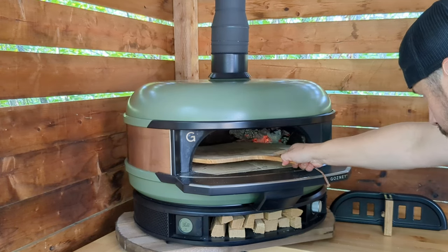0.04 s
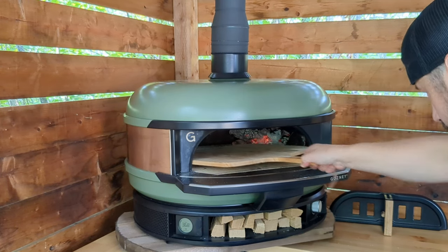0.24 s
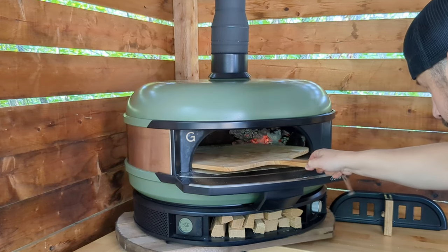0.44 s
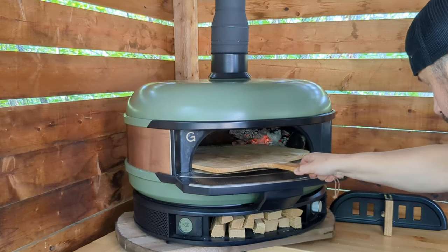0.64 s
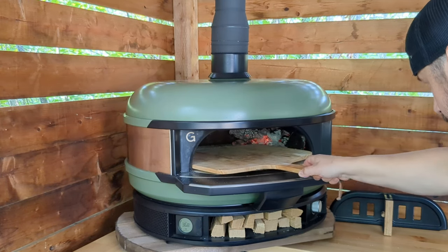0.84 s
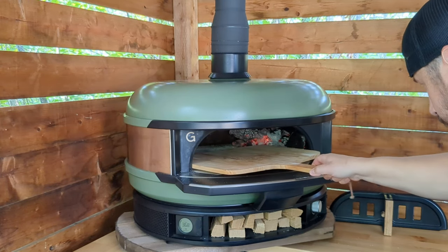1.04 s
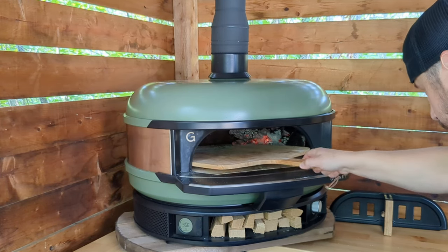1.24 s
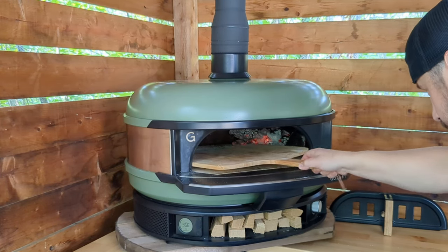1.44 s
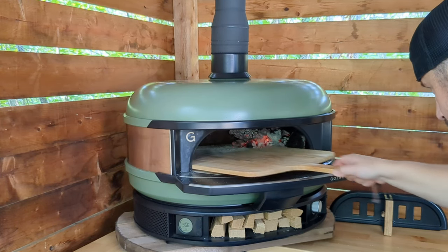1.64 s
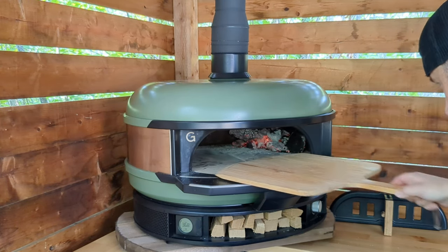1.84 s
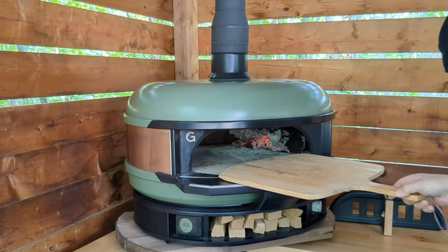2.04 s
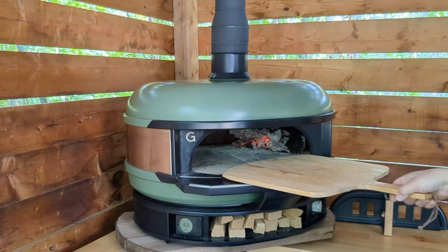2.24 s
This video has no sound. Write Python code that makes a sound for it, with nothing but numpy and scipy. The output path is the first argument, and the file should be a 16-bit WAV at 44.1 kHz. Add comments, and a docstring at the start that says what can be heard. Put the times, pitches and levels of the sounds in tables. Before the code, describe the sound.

Short rasping strokes of a wooden paddle ring faintly inside a pizza oven under a timber shelter. Early on the blade clacks and thumps down, then shudders as it drags, squeaks briefly and bumps its way out.

```python
"""A wooden peel (a baker's paddle) is shuffled over the stone floor of a domed oven, then drawn out.
Grit under its blade rasps in short strokes and makes the dome ring; the edge catches and chirps.
The blade drops once with a clack and a thump, shudders as it is dragged and gives soft, hollow knocks.
The timber shelter around the oven adds a short echo, over quiet outdoor air."""
import sys
import numpy as np
from scipy import signal
from scipy.fft import rfft, irfft
from scipy.io import wavfile
from scipy.ndimage import uniform_filter1d

SR = 44100
rng = np.random.default_rng(int(sys.argv[2]) if len(sys.argv) > 2 else 0)


def log_audio(samples):
    """Write samples as a 16-bit WAV file to the path given in sys.argv[1]."""
    # one column per channel
    frames = np.atleast_2d(samples).T
    # limit to full scale, then quantise
    limited = np.clip(frames, -1, 1)
    pcm = np.round(limited * 32767).astype(np.int16)
    wavfile.write(sys.argv[1], SR, pcm)


N = 101429
T = np.arange(N) / SR
HZ = np.fft.rfftfreq(N, 1 / SR)


# How far the blade is out of the dome. Each row: time in seconds, share from 0 (in) to 1 (out).
BLADE_OUT = [(1.62, 0.06), (1.79, 0.26), (1.86, 0.98), (1.99, 0.83), (2.1, 0.5)]
# The rasp's tone inside the dome and on the oven's lip. Each row: frequency in Hz, level in dB.
RASP_INSIDE = [(60, -33), (205, -10), (310, -27), (520, -11), (830, -12), (1150, -11), (1600, -2.5),
               (2100, -9), (2700, -4.5), (3700, -10), (5400, -20.5), (8000, -22.5), (11000, -18),
               (15000, -31)]
RASP_ON_LIP = [(100, -29), (900, -9), (1500, -3), (2700, -4), (4400, -6.5), (5800, -10), (8000, -14),
               (11500, -13), (15500, -22)]

def scrape():
    """Grit and wood fibre rasp under the chattering blade, ringing the dome less as the blade leaves."""
    grains_per_s, ripple_db, ripple_step_hz = 5000, 2, 45.16
    grit = (rng.random(N) < grains_per_s / SR) * amp(np.minimum(rng.exponential(1, N), 5))
    friction = rng.standard_normal((2, N)) + amp(-2) * unit(grit * rng.choice([-1, 1], (2, N)))
    friction *= amp(0.76 * wander(rate_hz=90))  # chatter
    # Small random peaks in the tone stand for the dome's many high notes.
    steps = np.arange(0, SR / 2, ripple_step_hz)
    peaks = np.interp(HZ, steps, rng.standard_normal(len(HZ))[:len(steps)])
    ripple = amp(ripple_db * np.minimum(HZ / 3500, 1) * peaks)
    share_out = np.clip(curve(BLADE_OUT), 0, 1)
    rub = rubbing()
    inside = amp(-3.5) * (1 - share_out) * spread(friction, ripple * amp(read(RASP_INSIDE, HZ)))
    on_lip = amp(-4) * share_out * spread(friction, ripple * amp(read(RASP_ON_LIP, HZ)))
    return (inside + on_lip) * rub + dome((1 - share_out) * rub)


# Pushes and pulls of the blade. Each row: start in seconds, length in seconds, level in dB,
# swell time in seconds, change of level over the stroke in dB.
BLADE_STROKES = [(-.03, 0.02, -54, .01, 6.5), (0.033, 0.069, -54, 0.032, -2),
                 (0.134, 0.14, -43.5, 0.094, 1), (0.253, 0.12, -42, 0.09, 4),
                 (0.492, 0.061, -48.5, 0.066, -1.5), (0.576, 0.18, -46, 0.017, -6),
                 (0.796, 0.15, -50, 0.019, -7.5), (0.948, 0.16, -40.5, 0.14, -2),
                 (1.133, 0.14, -42, 0.04, -1), (1.328, 0.082, -39, 0.025, -9),
                 (1.442, 0.077, -44.5, 0.041, -3), (1.542, 0.21, -40, 0.086, 4),
                 (1.734, 0.27, -41, 0.042, -4), (2.067, 0.07, -47.5, 0.028, -5.5)]

def rubbing():
    """The strength of the rub: each stroke swells, lasts while the blade moves, then dies quickly."""
    fade_db_per_s = 319
    power = np.zeros(N)
    for start, length, db, swell_s, change_db in BLADE_STROKES:
        t = T - start
        swell = np.sin(np.pi / 2 * np.clip(t / swell_s, 0, 1))
        level_db = db + change_db * np.clip(t / length, 0, 1) - fade_db_per_s * np.maximum(t - length, 0)
        power += (swell * amp(level_db)) ** 2
    return np.sqrt(power)


# The notes the dome rings at. Each row: pitch in Hz, relative level in dB.
DOME_NOTES = [(400, -1), (640, -8), (998, 6), (1046, 10.5), (1124, 1), (1194, -1), (1345, 0), (1466, 7),
              (1522, 4), (1703, 7), (1868, 5), (1962, 2), (2222, 3.5), (2295, 7), (2453, 0), (2635, 1),
              (2800, 1), (3030, -3), (4040, -5)]

def dome(force):
    """Rubbing rings the oven's hollow; as the contact point moves, now one note stands out, now another."""
    width_hz, flicker_db = 26, 3.5
    notes = sum(amp(db) / (1 + 1j * (HZ - hz) / width_hz) ** 2 for hz, db in DOME_NOTES)
    spectra = signal.stft(rng.standard_normal((2, N)), nperseg=512)[2]
    # Random loud and soft patches, smoothed over time and then over pitch.
    patches = uniform_filter1d(rng.standard_normal(spectra.shape[1:]), size=7, axis=1)
    patches = unit(uniform_filter1d(patches, size=2, axis=0))
    noise = signal.istft(spectra * amp(flicker_db * np.clip(patches, -2, 2)))[1][:, :N]
    return np.sqrt(np.mean(force ** 2)) * spread(force * noise, notes)


# Chirps of the edge. Each row: start in seconds, length in seconds, level in dB, pitch in Hz.
CHIRPS = [(0.2, 0.039, -40, 1017), (.3, 0.047, -39.5, 1033), (1.56, 0.026, -44, 2295),
          (1.596, .028, -44, 2295), (1.63, 0.011, -34, 1050), (1.686, 0.023, -32.5, 1055),
          (1.712, 0.051, -41, 1515), (1.721, 0.032, -36.5, 3060), (1.722, 0.055, -42, 2760),
          (1.82, 0.022, -40.5, 1257)]

def catches():
    """The edge sticks and slips, giving brief chirps that waver in pitch."""
    out = np.zeros(N)
    for start, length, db, hz in CHIRPS:
        t = np.arange(0, length, 1 / SR)
        cycles = np.cumsum(hz * (1 + 0.015 * wander(rate_hz=73)[:len(t)])) / SR
        add(out, start, amp(db) * np.sin(np.pi * t / length) * np.sin(2 * np.pi * cycles))
    return shelter(out, wet_db=-5)


# The edge hitting the stone. Each row: start in seconds, relative level in dB.
EDGE_HITS = [(.371, -20.5), (.38, -21), (1.767, -32), (1.796, -40)]
# The notes of the clacking edge and of the whole peel bending.
# Each row: pitch in Hz, relative level in dB, seconds to fade by 60 dB.
CLACK_NOTES = [(275, -4, .07), (400, -6, .1), (570, -11, .06), (650, -3, .07), (800, -9, .075),
               (1040, -3, .085), (1338, 3, .05), (1460, -3, .05), (1610, -5, .05), (1715, -2, .05),
               (2340, -11, .05)]
THUMP_NOTES = [(72.46, -24.5, 0.86), (95.2, -17.5, 0.47), (114.3, -5, 0.35), (177, -11.5, 0.28),
               (208.7, -2.5, 0.17), (286.8, -8, 0.094), (371, -17.5, 0.267)]

def drops():
    """The edge clacks down on the stone; once, the peel's weight follows with a thump."""
    thump_s, thump_db = 0.378, -15.5
    edge, body = np.zeros(N), np.zeros(N)
    for start, db in EDGE_HITS:
        add(edge, start, amp(db - 9.5) * ring(CLACK_NOTES, rise_cycles=0.24, bright_hz=3000))
        add(edge, start, amp(db - 14.5) * crunch(fade_s=0.075, top_hz=2060))
    add(body, thump_s, amp(thump_db) * ring(THUMP_NOTES, rise_cycles=1.9, bright_hz=700))
    add(body, thump_s, amp(thump_db - 18) * crunch(fade_s=0.17, top_hz=700))
    return shelter(edge, wet_db=-7) + shelter(body, wet_db=-15)


# The shaking of the peel. Each row: time in seconds, level in dB, pitch of the low note in Hz.
PEEL_SHUDDER = [(0, -68.5, 111.3), (.4, -55.5, 113.6), (.5, -41, 110.7), (.55, -52, 95.3),
                (.61, -42, 110.2), (.67, -48, 100), (.72, -50, 92.6), (.95, -60, 93.25), (1.08, -51, 111.8),
                (1.3, -72, 109.9), (1.95, -67.5, 112.7), (2.02, -53.5, 105)]

def shudder():
    """Dragging shakes the peel at a low note and its overtone, near the thump's two strongest notes."""
    overtone_ratio, overtone_db = 1.9, -7
    phase = 2 * np.pi * np.cumsum(curve(PEEL_SHUDDER, column=2)) / SR
    low_wobble = 1 + 0.55 * (wander(rate_hz=32) + 1j * wander(rate_hz=42))  # in level and phase
    high_wobble = wander(rate_hz=26) + 1j * wander(rate_hz=46)
    low = (np.exp(1j * phase) * low_wobble).real
    high = (np.exp(1j * overtone_ratio * phase) * high_wobble).real
    return amp(curve(PEEL_SHUDDER)) * (unit(low) + amp(overtone_db) * unit(high))


# Bumps of the blade. Each row: start in seconds, relative level in dB, treble limit in Hz, pitch factor.
BUMPS = [(.085, -49, 503, 1.06), (0.163, -42, 200, 0.74), (0.3, -36, 230, 0.97), (1.043, -45.5, 234, 0.82),
         (1.757, -28, 227, 0.99), (1.993, -33, 760, 1), (2.175, -42.5, 422, 0.87)]
# Their ring. Each row: pitch in Hz before that factor, relative level in dB, seconds to fade by 60 dB.
HOLLOW_NOTES = [(216, 0, 0.08), (384, 3, 0.13), (425, -3, 0.13), (555, -3, 0.06), (606, -7, 0.18),
                (862, -6, 0.14)]

def knocks():
    """The blade bumps the oven's floor and lip with a soft, hollow sound."""
    out = np.zeros(N)
    for start, db, bright_hz, pitch in BUMPS:
        notes = np.array(HOLLOW_NOTES) * [pitch, 1, 1]
        add(out, start, amp(db - 3.5) * ring(notes, rise_cycles=0.29, bright_hz=bright_hz))
        add(out, start, amp(db - 20) * crunch(fade_s=0.1, top_hz=bright_hz))
    return shelter(out, wet_db=-10)


def ring(notes, rise_cycles, bright_hz):
    """Struck wood: each note builds up quickly and dies away; a soft blow leaves out the high ones."""
    t = np.arange(SR) / SR
    out = np.zeros(SR)
    for k, (hz, db, fade_s) in enumerate(notes):
        envelope = amp(db - 60 * t / fade_s) * (1 - np.exp(-t * hz / rise_cycles))
        muffling = np.sqrt(1 + (hz / bright_hz) ** 8)
        out += (-1) ** k * envelope * np.sin(2 * np.pi * hz * t) / muffling
    return out


def crunch(fade_s, top_hz):
    """A short puff of noise from crushed grit."""
    t = np.arange(SR // 4) / SR
    band = signal.butter(2, [top_hz / 4, top_hz], "band", fs=SR)
    return unit(signal.lfilter(*band, rng.standard_normal(len(t)))) * amp(-60 * t / fade_s)


# The length of the shelter's echo. Each row: frequency in Hz, seconds to fade by 60 dB.
ECHO_TIMES = [(100, 0.55), (2000, 0.055), (15000, 0.076)]

def shelter(x, wet_db):
    """Adds the short, blurred echo of the timber walls, at level wet_db."""
    echoes = spread(rng.standard_normal((2, N)), 1)[:, :SR // 2] * (T[:SR // 2] > 0.004)
    hz, t, spectra = signal.stft(echoes, SR, nperseg=256)
    tail = signal.istft(spectra * amp(-60 * t / read(ECHO_TIMES, hz)[:, None]), SR, nperseg=256)[1]
    tail /= np.linalg.norm(tail[0])
    return x + amp(wet_db) * signal.fftconvolve(np.atleast_2d(x), tail, axes=1)[:, :N]


# The tone of the outdoor air. Each row: frequency in Hz, relative level in dB.
AIR_TONE = [(25, -9), (60, 5), (150, -7), (600, -13.5), (1500, -25), (15500, -39)]

def air():
    """A quiet, steady, low outdoor rush."""
    return amp(-58.5) * spread(rng.standard_normal((2, N)), amp(read(AIR_TONE, HZ)))


# How alike left and right are. Each row: frequency in Hz, likeness from 0 to 1.
LIKENESS = [(130, 0.99), (300, 0.9), (600, 0.52), (2000, .5), (5000, 0.05)]
# Which side is louder. Each row: frequency in Hz, left minus right in dB.
LEFT_RIGHT = [(1100, -0.57), (2500, 0.74), (9000, 0.62), (13000, -2.2)]

def spread(pair, tone):
    """Turns two unrelated signals into stereo of standard level with this tone, alike in the bass."""
    a, b = rfft(pair)
    same = read(LIKENESS, HZ)
    mid, side = a * np.sqrt(1 + same), b * np.sqrt(1 - same)
    tilt = amp(read(LEFT_RIGHT, HZ) / 2)
    out = irfft(np.array([(mid + side) * tilt, (mid - side) / tilt]) * tone, N)
    return out / np.std(out.mean(0))


def amp(db):
    """Turns decibels into a gain."""
    return 10 ** (np.asarray(db) / 20)


def unit(x):
    """Scales a signal to an average (rms) level of 1."""
    return x / np.sqrt(np.mean(x ** 2) + 1e-20)


def read(points, hz):
    """Looks up a table by frequency, sliding between rows on a log scale."""
    row_hz, value = np.transpose(points)
    return np.interp(np.log(hz + 1), np.log(row_hz + 1), value)


def curve(rows, column=1):
    """Looks up a table by time, at every sample."""
    rows = np.array(rows)
    return np.interp(T, rows[:, 0], rows[:, column])


def add(mix, start, sound):
    """Mixes a sound in at a start time in seconds."""
    part = mix[round(start * SR):][:len(sound)]
    part += sound[:len(part)]


def wander(rate_hz):
    """A smooth random wobble, up to about rate_hz fast."""
    return unit(irfft(rfft(rng.standard_normal(N)) / (1 + (HZ / rate_hz) ** 4), N))


def scene():
    """All the sounds of the peel, over the outdoor air."""
    return shelter(scrape(), wet_db=-12) + catches() + drops() + shudder() + knocks() + air()


def record(dry):
    """Trims away the deepest bass and the highest treble."""
    low_cut_hz, high_cut_hz = 50, 15750
    dry = signal.lfilter(*signal.butter(2, low_cut_hz, "high", fs=SR), dry)
    treble_cut = signal.firwin(511, high_cut_hz, window=("kaiser", 9), fs=SR)
    return signal.oaconvolve(dry, treble_cut[None], "same")


dry = scene()
out = record(dry)
log_audio(out)
```